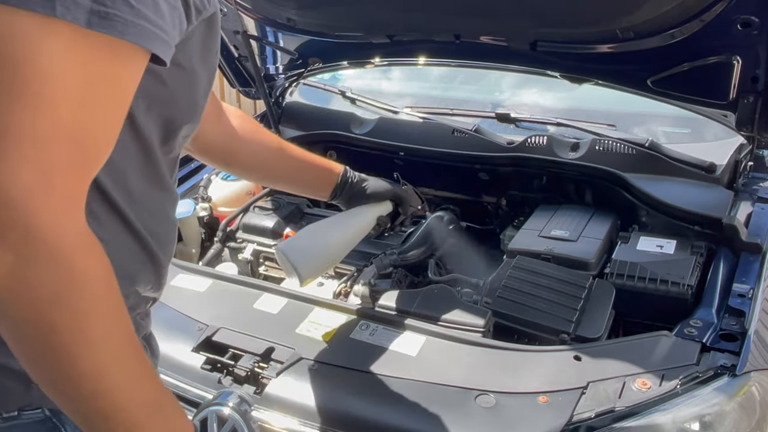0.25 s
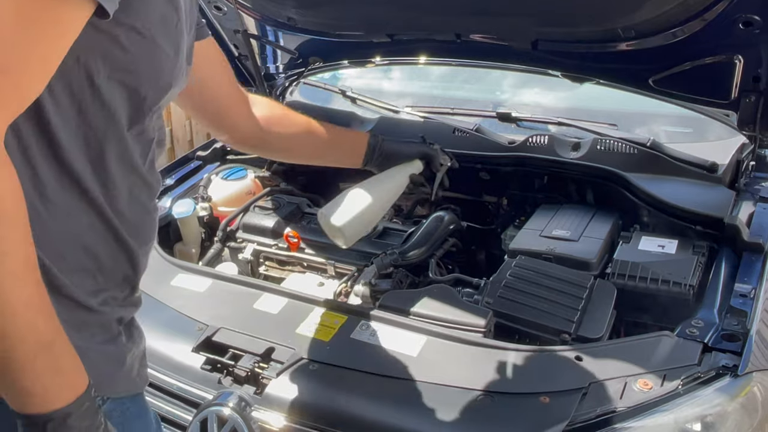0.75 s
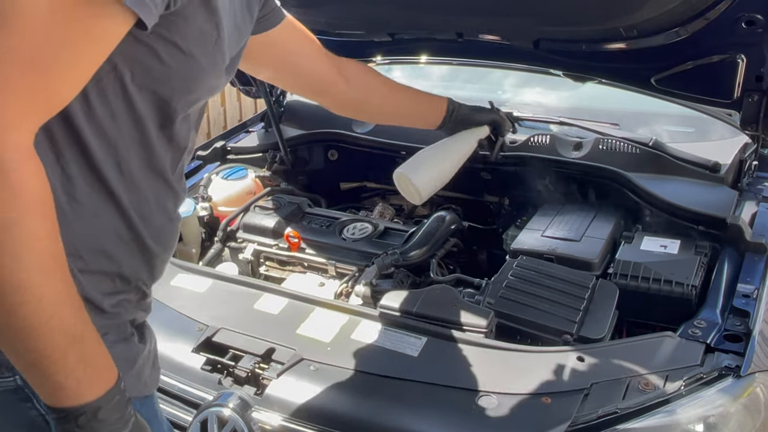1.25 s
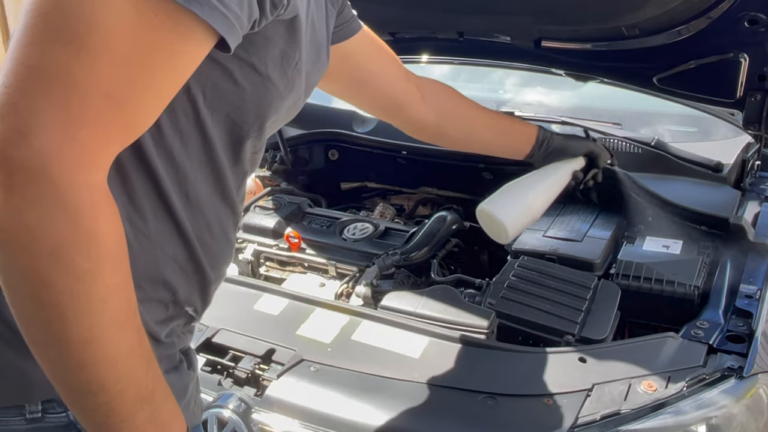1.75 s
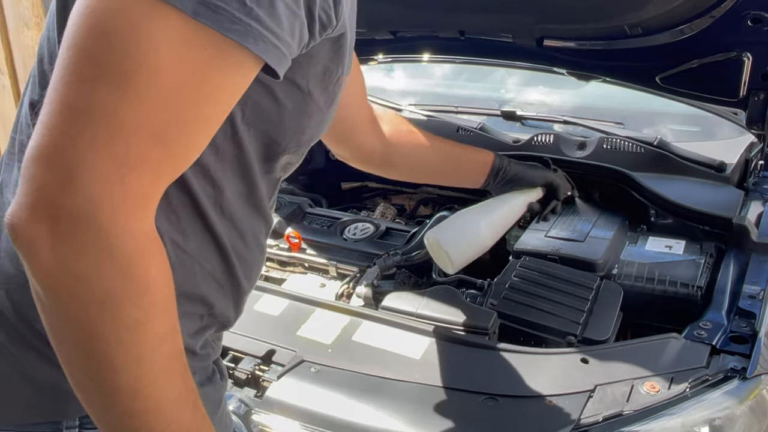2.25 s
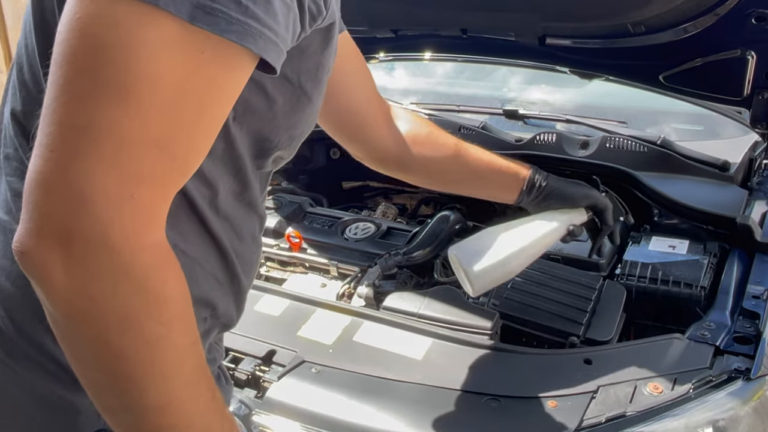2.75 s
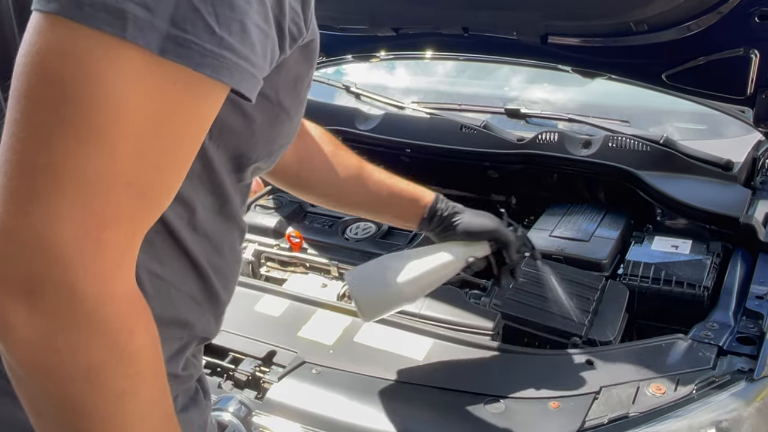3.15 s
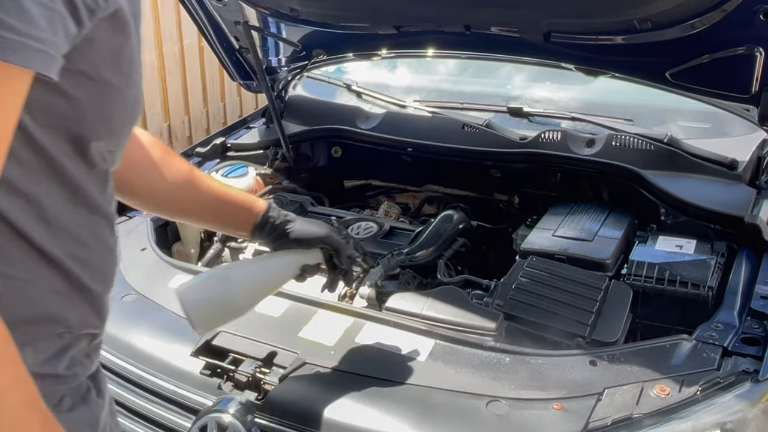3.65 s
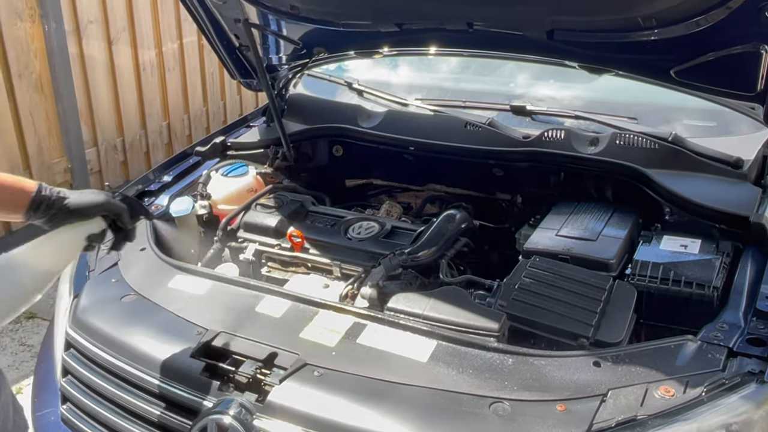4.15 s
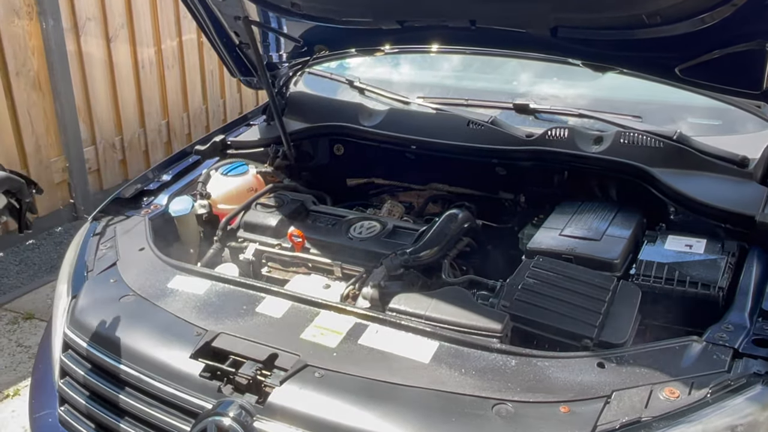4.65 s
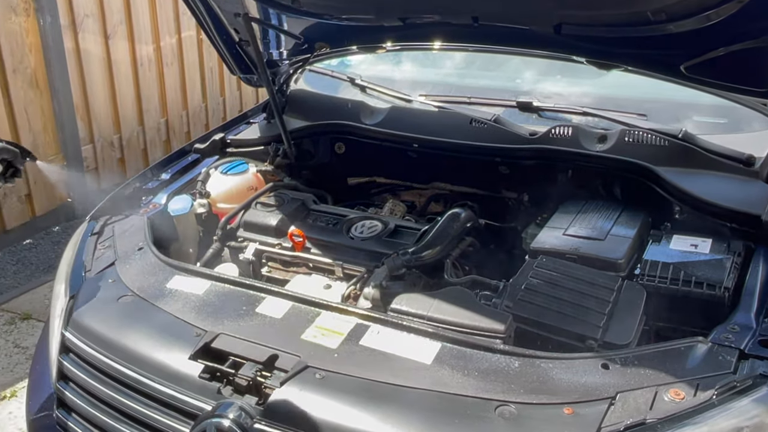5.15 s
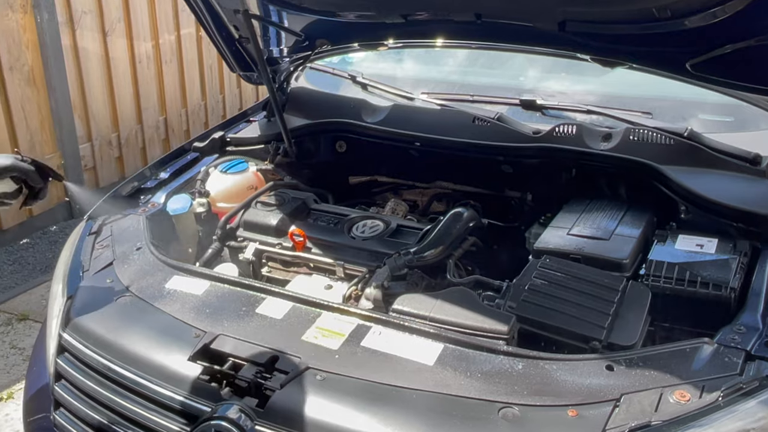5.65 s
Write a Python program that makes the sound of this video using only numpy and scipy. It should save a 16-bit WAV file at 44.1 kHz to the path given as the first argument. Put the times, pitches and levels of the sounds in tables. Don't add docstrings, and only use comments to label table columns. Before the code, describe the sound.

Outdoors, near an open engine bay, a hand trigger sprayer works steadily for about six seconds. Around twenty squeezes come about 0.3 seconds apart, each a bright hiss under a fifth of a second, with fine drops splashing and misting on plastic covers. The tail of one burst is heard at the start. The plastic head clacks, rattles and ticks between sprays, with firm knocks near 1.25, 1.5 and 2.65 and the hardest at 2.85 seconds, then a cluster around 3.65. The splash is fullest near 3.45; a strong burst follows at 3.8. From about 4 seconds the spray becomes thinner and airier, with only small crisp ticks and refill sizzles. Low wind buffets the small stereo microphone, with dull pops around 1.1 to 1.8, 3.25 to 3.8 and 4.5 seconds. A faint distant rumble lies underneath; the bay adds only a short diffuse tail. Spritzing continues to the end.

```python
import sys
import numpy as np
from scipy import signal
from scipy.fft import rfft, irfft, next_fast_len
from scipy.io import wavfile
from scipy.ndimage import uniform_filter1d

SR = 44100
rng = np.random.default_rng(int(sys.argv[2]) if len(sys.argv) > 2 else 0)


def decibels_to_gain(level_db):
    exponent = np.asarray(level_db, float) / 20
    return 10 ** exponent


def to_wav(sig):
    pcm = np.clip(np.atleast_2d(sig), -1, 1) * 32767
    pcm = np.round(pcm).astype(np.int16)
    wavfile.write(sys.argv[1], SR, pcm.T)


N = 260631
FAST = next_fast_len(N)
TIME_S = np.arange(N) / SR
COARSE_S = np.arange(0, N / SR + .002, .001)


def read(points, hz):
    f, *values = np.transpose(points)
    return np.squeeze([np.interp(np.log(hz + 1), np.log(f + 1), v) for v in values])


def evened(x):
    return x / np.sqrt(np.mean(x ** 2) + 1e-20)


def coloured(x, points):
    gain = decibels_to_gain(read(points, np.fft.rfftfreq(FAST, 1 / SR)))
    return evened(irfft(rfft(x, FAST) * gain, FAST)[..., :N])


def slow(hz):
    b, a = signal.butter(2, hz, fs=SR)
    return evened(signal.lfilter(b, a, rng.standard_normal(N)))


def ringing(t, hz, t60):
    return decibels_to_gain(-60 * t / t60) * np.sin(2 * np.pi * hz * t)


def swelling(at, rise, fade_db_per_s):
    u = COARSE_S - at
    return np.clip(1 + u / rise, 0, 1) * decibels_to_gain(fade_db_per_s * np.maximum(u, 0))


def from_coarse(level):
    return np.interp(TIME_S, COARSE_S, level)


def droplets(per_s, spread_db, hiss):
    size = decibels_to_gain(spread_db * np.minimum(rng.exponential(1, N), 5))
    size = size * (rng.random(N) < per_s / SR)
    return evened(size) * rng.choice([-1., 1.], (2, N)) + hiss * rng.standard_normal((2, N))


# f/Hz, level/dB
OUTDOORS = [(120, -17), (200, -0.5), (460, -2.5), (786, -4), (1650, -17), (3330, -20), (5120, -23),
            (7000, -40), (9100, -31), (15400, -120)]


def outdoors():
    level_db, swell_db, swell_s, width_s = -55, 4, 4.2, 0.076
    swell = swell_db * np.exp(-((TIME_S - swell_s) / width_s) ** 2)
    return decibels_to_gain(level_db + swell) * coloured(rng.standard_normal((2, N)), OUTDOORS)


# t/s, buffet level/dB
WIND = [(0.0, -50), (0.3, -62), (0.55, -49.5), (0.8, -53), (1.05, -46), (1.25, -47.5), (1.6, -53),
        (1.7, -49), (2.09, -59.5), (2.67, -51.5), (3.18, -53), (3.5, -48), (4.05, -61.5), (4.23, -51.5),
        (4.38, -59), (4.84, -47), (4.9, -58), (5.91, -56.5)]
# f/Hz, level/dB
BUFFET = [(20, -68), (35, -2.5), (55, 5.5), (85, 3), (125, -2), (170, -13), (300, -63.5)]
# f/Hz, level/dB
RUMBLE = [(90, -32), (150, 6.5), (220, 11.5), (320, 2), (500, -35)]
# t/s, peak level/dB, f/Hz, sharp edge over peak/dB
POPS = [(1.125, -25.5, 97.6, -25), (1.166, -19.5, 90, -16.5), (1.21, -26, 80.5, -30),
        (1.244, -26, 100, -20), (1.406, -18, 90.5, -22), (1.491, -22, 82, -20), (1.515, -17.5, 86, -24),
        (1.54, -29, 57, -24), (1.552, -31.5, 90, 5), (1.665, -29.5, 80, -18), (1.761, -34, 90.5, -11.5),
        (2.93, -35, 61.3, -8), (3.258, -19.5, 96, -17), (3.278, -26.5, 121, -7.5), (3.372, -31, 70.6, -10),
        (3.576, -43.5, 110, 6), (3.618, -51, 64, -22), (3.68, -35, 102, -1), (3.754, -18.5, 99, -12),
        (3.796, -25, 69.6, -2.5), (4.48, -24.5, 62, -30), (4.571, -28, 61, -25)]


def wind():
    rumble_db, rumble_follows = -58.5, 0.35
    wake_db, wake_rise_s, wake_t60_s, edge_t60_s = -13.5, 0.0098, 0.35, 0.068
    gust_db = np.interp(COARSE_S, *np.transpose(WIND))
    gust = decibels_to_gain(gust_db)
    rumble = decibels_to_gain(rumble_db + rumble_follows * (gust_db - gust_db.mean()))

    pops, u = np.zeros(N + 2000), np.arange(2000) / SR
    for at, peak_db, hz, edge_db in POPS:
        thump = np.minimum(u / 0.0042, 1) * ringing(u, hz, 0.16)
        edge = np.minimum(u / 0.0018, 1) * decibels_to_gain(edge_db + 13.0) * ringing(u, 235, 0.016)
        start = round(at * SR)
        pops[start:start + 2000] += decibels_to_gain(peak_db - 8.5) * (thump + edge)
        wake = decibels_to_gain(peak_db + wake_db) * swelling(at + wake_rise_s, wake_rise_s, -60 / wake_t60_s)
        edge_wake = decibels_to_gain(peak_db + edge_db - 5.5) * swelling(at + 0.0017, wake_rise_s, -60 / edge_t60_s)
        gust, rumble = np.hypot(gust, wake), np.hypot(rumble, edge_wake)

    eddies = rng.standard_normal((2, N))
    low = coloured(eddies, BUFFET) * from_coarse(gust) * decibels_to_gain(1.0 + 2.2 * slow(17.7))
    high = coloured(eddies, RUMBLE) * from_coarse(rumble) * decibels_to_gain(-3.0 + 2.0 * slow(26.0))
    shared, apart = low + high
    pops_at_ports = pops[:N] * decibels_to_gain([[.7], [-.7]])
    return shared + pops_at_ports + 0.3 * apart * np.array([[1], [-1]])


# f/Hz, level/dB
DRIBBLE_COLOUR = [(700, 5.5), (1100, 0.5), (2000, -3), (4500, -0.5), (8000, -8), (13000, -22),
                  (15500, -11.5)]


def dribble():
    drip_db, lead_s, rise_s, fade_db_per_s = -77.5, 0.069, 0.077, -63.5
    level = decibels_to_gain(drip_db)
    for start, _, length, _, refill_db in STROKES:
        peak_s = start + length - lead_s + rise_s
        level = level + decibels_to_gain(refill_db) * swelling(peak_s, rise_s, fade_db_per_s)
    drops = coloured(droplets(1500, 3.1, 5.7), DRIBBLE_COLOUR)
    return from_coarse(level) * decibels_to_gain(-8.0 + 3.85 * slow(27)) * drops


# f/Hz, t60/s, level/dB
HOUSING = [
    (1977, 0.0032, -2),
    (3330, 0.0042, 1.5),
    (5960, .0008, 6),
    (10040, 0.00044, 6.5),
]


def clicks(rows, trigger_db, crack_db, snap_db):
    out, t = np.zeros((2, N + 1000)), np.arange(1000) / SR
    chance = rng.standard_normal((len(rows), 2, 1000))
    detune = 0.07 * rng.uniform(-1.3, 1, (len(rows), 4))
    for (s, neck_db, sharp_db), noise, off in zip(rows, chance, detune):
        knocks = noise * (decibels_to_gain(-60 * t / 0.0091) + 0.23 * decibels_to_gain(-60 * t / 0.087))
        knocks[:, 0] = 0.71
        parts_db = [0, trigger_db, crack_db + sharp_db, snap_db + sharp_db]
        start = round(s * SR)
        for (hz, t60, db), part_db, d in zip(HOUSING, parts_db, off):
            ring = ringing(t[None, :300], hz * (1 + d), t60)
            part = signal.fftconvolve(knocks, ring)[:, :1000]
            part = part / abs(part).max(axis=1, keepdims=True)
            out[:, start:start + 1000] += decibels_to_gain(neck_db + part_db + db) * part
    return signal.sosfilt(signal.butter(3, 1250, "high", fs=SR, output="sos"), out[:, :N])


# t/s, neck ring level/dB, sharpness/dB
TICKS = [(0.4439, -41, -8), (1.282, -47, -2.5), (1.331, -39, -9.5), (1.6133, -47.5, -5.5),
         (2.4703, -50, -1.5), (3.1444, -39.5, -7.5), (3.748, -45, -5), (4.375, -57, -1), (4.5091, -57, 10),
         (4.6334, -56, 4), (4.6839, -56.5, 0), (4.7204, -53.5, -1), (4.8404, -66, 8), (4.926, -68, -9),
         (4.95, -60, 5), (5.0432, -51.5, 8), (5.232, -61, 6), (5.3518, -53, 7), (5.5398, -55, 2),
         (5.5835, -64, 9), (5.6201, -56.5, 8), (5.8563, -56, 4.5)]


def valve_ticks():
    return clicks(TICKS, trigger_db=-11, crack_db=4, snap_db=4.5)


# t/s, neck ring level/dB, sharpness/dB
RATTLE = [(0.064, -49, 8), (0.092, -56, 5), (0.3152, -46, 0), (0.3371, -46.5, -5), (0.3551, -43, 5),
          (0.37, -50, 9), (0.658, -46, 6), (0.6663, -48.5, 5), (1.2554, -49, -4.5), (1.5184, -44.5, 6),
          (1.8141, -48.5, 9.5), (1.8218, -46, 1), (2.1221, -45.5, -6), (2.2106, -49, -4),
          (2.396, -45.5, 0.5), (2.507, -44, -8), (2.6708, -48.5, 6), (2.6814, -47.5, 6.5), (2.699, -49, 2),
          (2.8465, -29, -6), (3.05, -44.5, -5), (3.0557, -42.5, 3.5), (3.0943, -44.5, -8), (3.4067, -55, 3)]


def piston_rattle():
    return clicks(RATTLE, trigger_db=1.5, crack_db=-9, snap_db=-7.5)


# t/s, neck ring level/dB, sharpness/dB
KNOCKS = [(0.0257, -36.5, -6), (0.143, -37, 8.5), (0.954, -41, -7), (1.2336, -36, -2), (1.2374, -43, -6),
          (1.2453, -29.5, -14), (1.4875, -52, -3), (1.499, -37, -8), (1.507, -32, -11), (1.512, -38, -13),
          (2.0857, -33.5, -2), (2.371, -34.5, -8), (2.6517, -32, 0.5), (2.8472, -28.5, 4), (3.015, -41, -8),
          (3.0725, -36, 0), (3.316, -42, -2), (3.338, -42, -6), (3.3513, -43, 4), (3.359, -35, 5),
          (3.6293, -37, 8), (3.638, -41, 0), (3.6461, -33.5, -9), (3.655, -41, -2), (3.664, -37.5, -5),
          (3.672, -40, 5), (3.9752, -42, 8)]


def trigger_knocks():
    return clicks(KNOCKS, trigger_db=-13.5, crack_db=-19.5, snap_db=-15)


def patchy(x, depth_db):
    z = signal.stft(x, nperseg=256)[2]
    patches = uniform_filter1d(rng.standard_normal(z.shape[1:]), size=5, axis=0)
    patches = uniform_filter1d(patches, size=10, axis=1)
    return signal.istft(z * decibels_to_gain(depth_db * evened(patches)), nperseg=256)[1][:, :N]


# start t/s, rise/s, length/s, jet level/dB, refill sizzle level/dB
STROKES = [(-0.06, .03, 0.095, -50.5, -47.5), (0.153, 0.035, 0.18, -54.5, -61),
           (0.458, 0.043, .19, -57, -59.5), (0.768, 0.032, 0.18, -55, -56),
           (1.075, 0.02, .16, -55.5, -50.5), (1.329, 0.036, .17, -56, -61),
           (1.626, .036, 0.16, -56.5, -56.5), (1.892, .03, .17, -57.5, -54.5),
           (2.191, 0.049, 0.18, -57.5, -64), (2.484, 0.023, 0.15, -56.5, -75),
           (2.855, 0.011, 0.17, -57, -47.5), (3.144, 0.048, 0.2, -54, -43.5),
           (3.407, 0.11, 0.243, -54, -61), (3.761, 0.025, 0.2, -49.5, -53), (4.099, 0.043, 0.2, -56, -46.5),
           (4.44, 0.077, 0.15, -52.5, -54.5), (4.753, 0.096, .17, -54, -50), (5.037, 0.062, 0.18, -57, -61),
           (5.346, .01, .17, -56.5, -67), (5.62, .012, 0.18, -55.5, -52.5)]
# t/s, splash over jet/dB, mist over jet/dB
AIM = [(.23, -3.5, -7), (.55, -0.5, -1.5), (1.13, -2.5, -11), (1.4, -1.5, -13), (1.96, -1, -0.5),
       (2.28, 2, -3.5), (2.54, -2.5, -6), (2.95, 2, -1), (3.23, -3, -4), (3.45, 6, -1), (3.6, -7.5, -12),
       (3.8, -21, -38), (4.17, -5.5, -2), (4.52, -29, -4), (5.14, -34, -4.5), (5.43, -19, -7),
       (5.69, -18, -10.5)]
# f/Hz, level/dB
JET = [(3000, -7), (7000, -3.5), (8500, 1), (10500, 1.5), (12800, -3.5), (15400, 2), (16000, -3)]
# f/Hz, level/dB
SPLASH = [(500, -29), (1000, -5), (1500, 0), (2300, 0.5), (3300, 4), (4300, -6.5), (6000, -43)]
# f/Hz, level/dB
MIST = [(2500, -31), (4500, -0.5), (5500, 5), (7000, -3.5), (9000, -47)]


def spray():
    open_db, sag_db, shut_db, release_s = -11, -1, -16, 0.06
    squeeze = np.zeros(N)
    for start, rise, length, jet_db, _ in STROKES:
        s = start + np.array([0, rise, max(length - release_s, rise), length])
        level_db = jet_db + np.interp(TIME_S, s, [open_db, 0, sag_db, shut_db])
        opening = np.clip((TIME_S - start) / (0.3 * rise), 0, 1)
        squeeze += opening * (TIME_S < s[-1]) * decibels_to_gain(level_db)
    leak = np.exp(-1 / (0.087 * SR))
    squeeze = np.maximum(squeeze, 0.42 * signal.lfilter([1 - leak], [1, -leak], squeeze))

    s, splash_db, mist_db = np.transpose(AIM)
    drops = droplets(5000, 1.6, 1.2)
    jet = coloured(drops, JET) * decibels_to_gain(8.5 + 1.0 * slow(60))
    splash = coloured(drops, SPLASH) * decibels_to_gain(np.interp(TIME_S, s, splash_db) + 0.75 * slow(27))
    mist = coloured(drops, MIST) * decibels_to_gain(np.interp(TIME_S, s, mist_db) + 1.1 * slow(71))
    flutter = decibels_to_gain(0.37 * slow(77))
    return uniform_filter1d(squeeze, size=260) * flutter * patchy(jet + splash + mist, depth_db=2.0)


# f/Hz, t60/s
BAY_T60 = [(1000, 0.49), (4000, 0.15), (9000, 0.11), (15000, 0.018)]


def bay(x):
    hz, t, z = signal.stft(rng.standard_normal((2, SR // 3)), SR, nperseg=256)
    decay = decibels_to_gain(-60 * t / read(BAY_T60, hz)[:, None])
    tail = signal.istft(z * decay, SR, nperseg=256)[1]
    return signal.oaconvolve(x, tail / np.linalg.norm(tail[0]), axes=1)[:, :N]


# f/Hz, left lead/rad, near likeness/1, far likeness/1, left over right/dB
PORTS = [(102, -2.5, 0.29, 1, 1), (650, 0.55, 0.99, 0.078, 0.5), (1480, 0.54, 0.37, 0.061, 0.5),
         (3570, 0.17, 0.81, 0.11, 1.7), (5200, 1.1, 0.63, 0.1, 3.5), (6240, 1.44, 0.59, 0.17, 1),
         (7200, -2, 0.42, 0.4, 6.5), (7710, -2.5, 0.92, 0.8, 1), (8210, -2.5, 0.65, 0.96, -3),
         (10340, -5.5, 0.5, 0.69, 0), (12900, -7.5, 1, .8, 0), (14400, -9.0, .8, .8, -1),
         (14900, -9.5, 0.94, .85, 3), (15540, -10, .75, 0.75, 4)]


def ports(pair, near):
    lead, same_near, same_far, pan_db = read(PORTS, np.fft.rfftfreq(FAST, 1 / SR))
    same = np.clip(same_near if near else same_far, 0, 1)
    left, twin = rfft(pair, FAST)
    right = same * left + np.sqrt(1 - same ** 2) * twin
    tilt = decibels_to_gain(pan_db / 2) * np.exp(.5j * lead)
    return irfft(np.array([left * tilt, right / tilt]), FAST)[:, :N]


def scene():
    bottle = spray() + trigger_knocks() + piston_rattle() + valve_ticks() + dribble()
    near = bottle + decibels_to_gain(-13.5) * bay(bottle)
    return ports(near, True) + ports(outdoors(), False) + wind()


def joint_stereo(x, low_db, high_db):
    lead_in = 333
    pair = np.pad([x[0] + x[1], x[0] - x[1]], ((0, 0), (lead_in, 0))) / 2
    hz, _, z = signal.stft(pair, SR, "cosine", nperseg=2048, noverlap=1024)
    power = (abs(z[:, :1024].reshape(2, 64, 16, -1)) ** 2).mean(axis=2)
    power = uniform_filter1d(uniform_filter1d(power, size=3, axis=2), size=2, axis=1)
    power_db = 10 * np.log10(power + 1e-20)
    band_hz = hz[8:1024:16, None]

    treble = np.pad((np.diff(pair, n=2) ** 2).sum(axis=0), (512, 4096))
    blocks = treble[:z.shape[2] * 1024].reshape(-1, 128).mean(axis=1) + 1e-14
    before = np.convolve(blocks, [0, .25, .25, .25, .25])[:len(blocks)] + 1e-14
    steady = (blocks / before).reshape(-1, 8).max(axis=1) < 20

    weaker = power_db[::-1] - power_db > np.where(band_hz < 7400, low_db, high_db)
    mute = weaker & steady & (band_hz > 1500)
    z[:, :1024] *= np.repeat(~mute, 16, axis=1)
    y = signal.istft(z, SR, "cosine", nperseg=2048, noverlap=1024)[1]
    mid, side = y[:, lead_in:lead_in + N]
    return np.array([mid + side, mid - side])


def band_limit(x):
    return signal.sosfilt(signal.butter(12, 16500, fs=SR, output="sos"), x)


def record(dry):
    limited = signal.oaconvolve(dry, signal.firwin(255, 15900, fs=SR)[None], "same")
    mix = joint_stereo(limited, low_db=9.5, high_db=4.5)
    return band_limit(mix)


dry = scene()
out = record(dry)
to_wav(out)
```